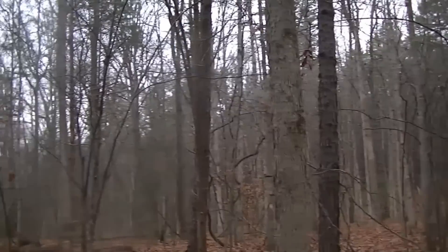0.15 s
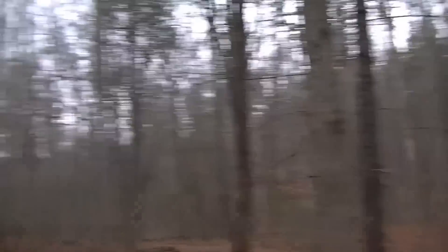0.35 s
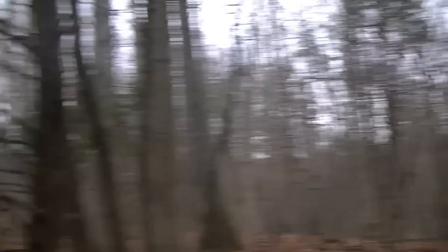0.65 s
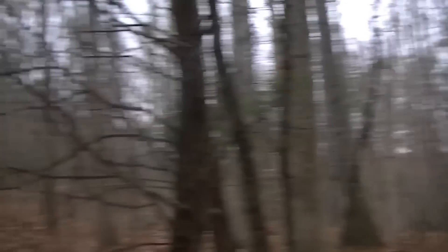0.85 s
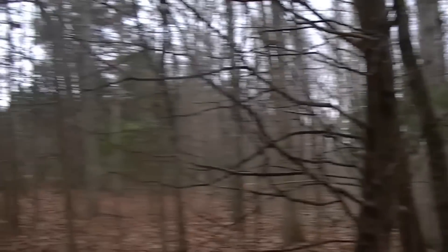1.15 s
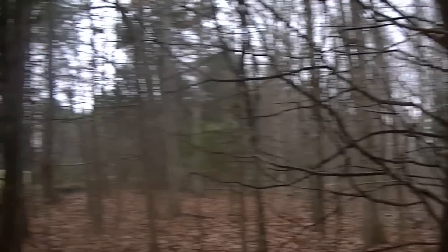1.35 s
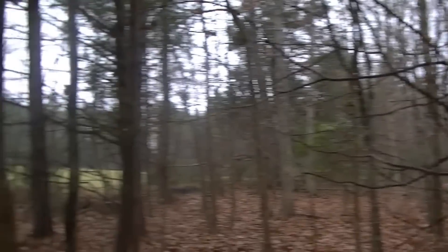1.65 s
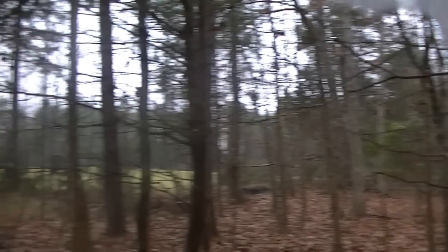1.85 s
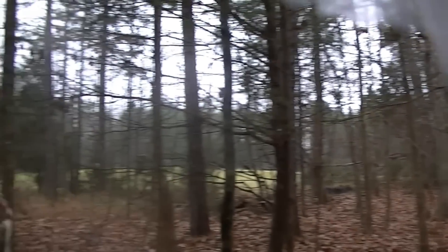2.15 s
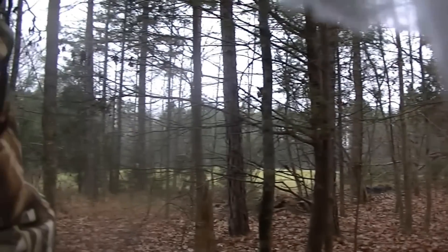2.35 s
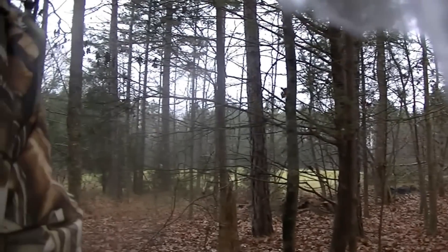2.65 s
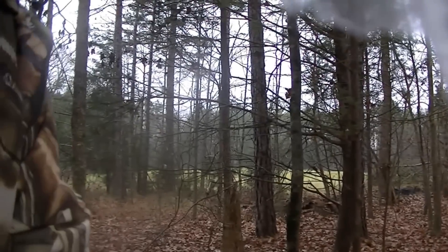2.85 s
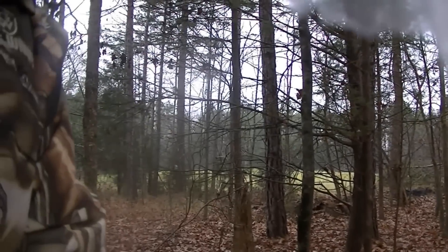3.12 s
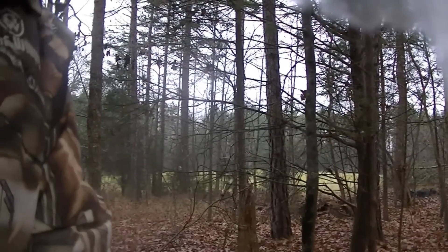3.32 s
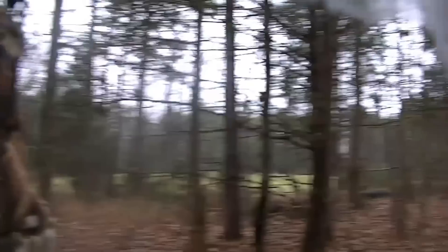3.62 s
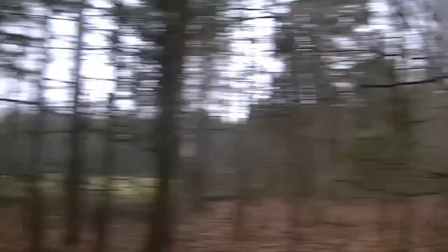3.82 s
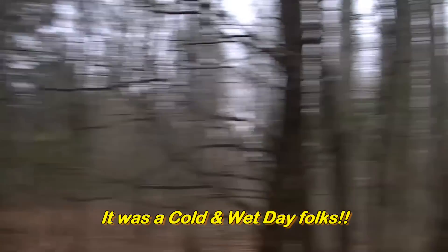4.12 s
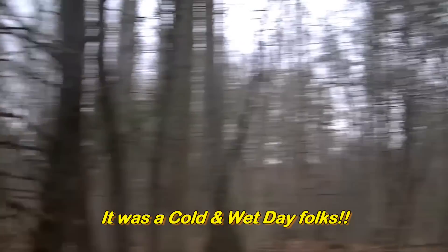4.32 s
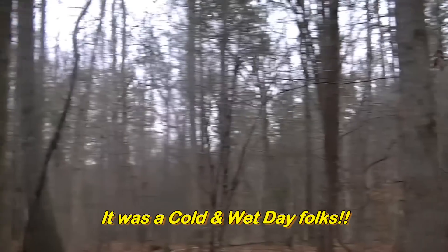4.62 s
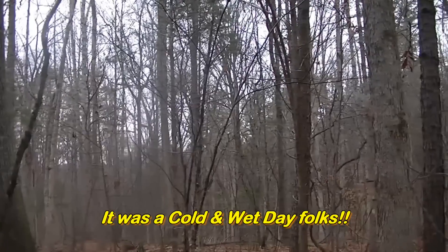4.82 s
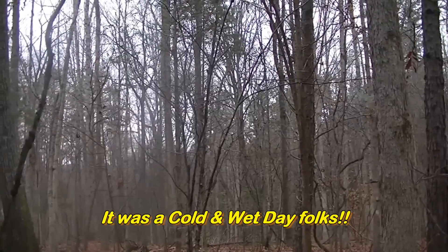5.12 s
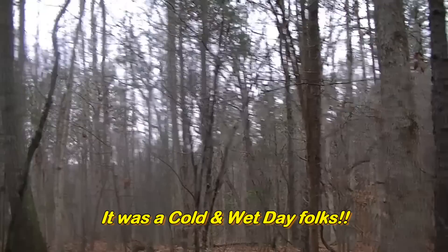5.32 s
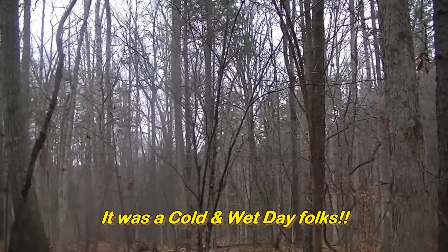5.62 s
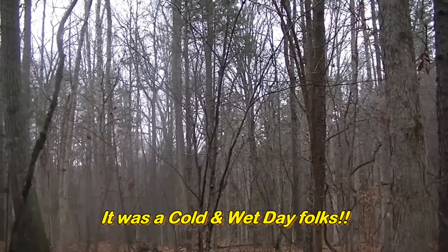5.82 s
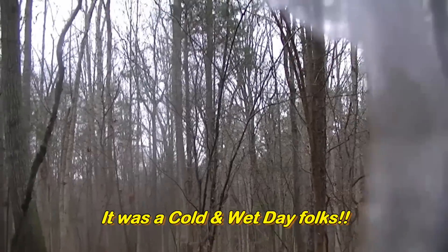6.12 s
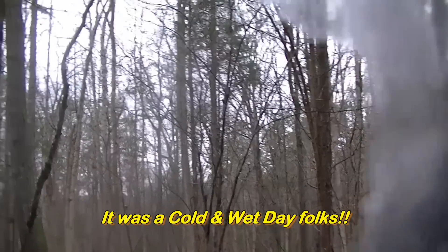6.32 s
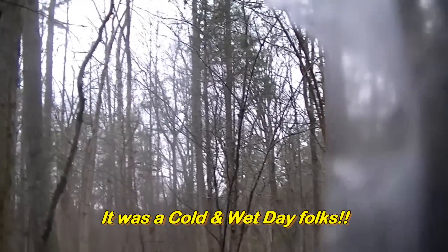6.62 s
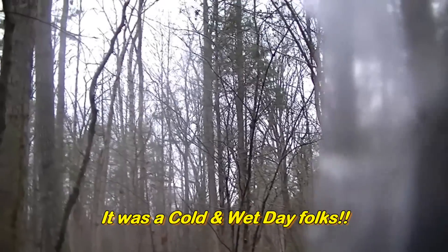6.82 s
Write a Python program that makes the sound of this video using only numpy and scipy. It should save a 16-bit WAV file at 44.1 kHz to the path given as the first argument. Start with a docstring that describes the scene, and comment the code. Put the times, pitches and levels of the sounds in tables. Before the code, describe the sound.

Very close, loud crinkling and snapping of thin plastic film with muffled handling bumps, easing briefly, then returning hard; quiet wet forest behind.

```python
"""Sharp plastic crackle and dull knocks, right up against a hand-held camera's stereo microphone.
A thin rain cover shifts in a wet forest: its creases snap as ringing noise bursts, its folds bump
the housing as decaying modes, and its strokes rumble and rustle as shaped noise.
Snaps and bumps leave a short diffuse tail; a narrow hiss swells twice as the camera turns.
Light rain and air lie beneath as a quiet noise floor."""
import sys
import numpy as np
from scipy import signal
from scipy.fft import rfft, irfft
from scipy.io import wavfile

SR = 44100
rng = np.random.default_rng(int(sys.argv[2]) if len(sys.argv) > 2 else 0)


def to_wav(sig):
    """Store sig (one row per channel, or 1-D mono) as 16-bit WAV at the path in sys.argv[1].

    Samples outside -1..1 are clipped; the rate is SR.
    """
    pcm = np.clip(np.atleast_2d(sig), -1, 1) * 32767
    pcm = np.round(pcm).astype(np.int16)
    wavfile.write(sys.argv[1], SR, pcm.T)  # frames by channels


def voltage_ratio(level):
    """Linear amplitude factor for a level in decibels (scalar or array-like)."""
    return 10 ** (np.asarray(level, float) / 20)


N = 306936   # length in samples

# Rain and air around the microphone. Each row: frequency in Hz, relative density in dB per Hz.
AIR_SPECTRUM = [(30, -12), (85, 6), (750, -2), (1200, -9), (6000, -24.5), (16000, -26)]
AIR_DB = -51   # rms
# Left-right likeness of the diffuse sound. Each row: frequency in Hz, correlation from 0 to 1.
STEREO_LIKENESS = [(60, 1), (200, 0.74), (1300, 0.35), (15000, 1)]
# Swells of narrow hiss as the camera turns. Each row: middle in seconds,
# time from the middle to 1/e of the amplitude in seconds, rms level at the middle in dB.
TURN_SWELLS = [(1.198, 0.3, -61), (4.1, 0.55, -56.5)]
TURN_HZ, TURN_WIDTH_HZ = 8300, 910   # width of each of two resonances in a row

# Strokes of the film across the housing. Each row: start in seconds, length in seconds,
# low rumble in dB, bright rustle in dB (both rms, before the sag).
FILM_STROKES = [(0.074, 0.082, -38.5, -46.5), (0.328, 0.062, -34.5, -51), (0.359, 0.42, -29, -40.5),
                (0.796, 0.48, -37, -51.5), (1.397, 0.93, -45.5, -53.5), (3.415, 0.2, -44.5, -51),
                (3.737, 0.58, -34, -45), (4.266, 0.053, -31.5, -40.5), (4.364, 0.31, -36, -52.5),
                (5.34, 0.062, -40.5, -81), (5.877, 0.23, -31.5, -46), (5.978, 0.21, -27, -38),
                (6.198, 0.048, -32.5, -37), (6.326, 0.021, -33, -38.5), (6.416, 0.188, -30, -40),
                (6.629, 0.39, -34, -41)]
# Level between strokes. Each row: rms level in dB; rumble first, then rustle.
RESTING_LEVELS = [
    [-54],
    [-55],
]
STROKE_ATTACK_S, STROKE_SAG_DB_PER_S, STROKE_RELEASE_DB_PER_S = 0.0146, 8, 240
# Low sound of the sliding film. Each row: frequency in Hz, relative density in dB per Hz.
RUMBLE_SPECTRUM = [(40, -20), (110, -4.5), (300, -4.5), (700, -14), (2400, -43)]
# Bright sound of the sliding film. Each row: frequency in Hz, relative density in dB per Hz.
RUSTLE_SPECTRUM = [(500, -9.5), (1200, 1), (2200, -5.5), (3500, 0), (16000, -18.5)]

# Folds knocking the housing. Each row: start in seconds, peak in dB before a slight tilt to the left,
# colour in Hz.
FOLD_BUMPS = [(0.0641, -19, 213), (0.1382, -18.5, 228.3), (0.3814, -8.5, 367), (0.422, -10, 253),
              (0.5061, -11, 310), (0.5471, -2.5, 520), (0.632, -11, 332), (0.8567, -15.5, 409),
              (0.933, -14, 397), (1.1199, -16.5, 272), (1.166, -16, 233.8), (1.2184, -15, 302.6),
              (1.4272, -19.5, 265), (1.63, -13.5, 474), (1.7861, -18.5, 535), (1.8493, -13.5, 284),
              (2.1824, -17, 295), (2.271, -18.5, 200), (2.4515, -21, 372), (2.5862, -21, 161),
              (2.9236, -25, 243), (3.0706, -5.5, 398), (3.2721, -10, 270), (3.5693, -9.5, 464),
              (3.6678, -17, 532), (3.7445, -13.5, 400), (3.8143, -10.5, 588), (3.8402, -8.5, 434),
              (4.0498, -10.5, 354), (4.16, -5, 146), (4.3866, -17.5, 377), (4.5016, -18.5, 304),
              (4.637, -17, 209.2), (5.257, -27, 190.8), (5.378, -20.5, 159.7), (5.9046, -13.5, 163.9),
              (6.0655, -8, 307), (6.104, -10.5, 573), (6.1195, -2, 428.4), (6.164, -0.5, 425),
              (6.3663, -4.5, 574), (6.434, -7.5, 570), (6.4757, -0.5, 579), (6.505, -12.5, 400)]
# Modes of the housing, before the grip shifts them. Each row: frequency in Hz, 60 dB decay in seconds.
HOUSING_MODES = [(98, 0.097), (130, 0.084), (170, 0.039), (235, 0.037), (310, 0.02), (400, 0.024),
                 (560, 0.016), (800, 0.013), (1200, 0.008)]
GRIPS, GRIP_OCTAVES = 9, 0.18   # ways the hand holds the housing; spread of each mode's shift
# Small folds: rate at a rumble of -45 dB, dB of rate per dB of rumble, least peak over the rumble
BUMPS_PER_S, BUMP_RATE_FOLLOWS, BUMP_OVER_RUMBLE_DB = 38, .3, 4.5
JOLT_DB, JOLT_HZ = -10.5, 905   # what each listed snap passes on to the housing, relative to the snap

# Creases popping on the housing. Each row: start in seconds, peak in dB, colour in Hz.
CREASE_SNAPS = [(0.1379, -12.5, 4452), (0.308, -17, 3697), (0.3841, -1.5, 4660), (0.3921, 0, 6480),
                (0.42, -4, 6620), (0.4345, 1, 9100), (0.4512, -10.5, 2803), (0.4909, -15, 1470),
                (0.526, -10.5, 1770), (0.5513, -9.5, 5730), (0.6226, -12, 5000), (0.6287, -1.5, 8630),
                (0.681, -2.5, 3350), (0.6906, -1.5, 8100), (0.6998, -14, 6000), (0.735, -8.5, 4400),
                (0.9947, -9, 4451), (1.4497, -18.5, 3706), (1.5504, -13, 5905), (1.6132, -11.5, 2814),
                (1.8794, -14, 3510), (1.885, -16.5, 1170), (1.9859, -17, 3940), (2.2467, -10.5, 3940),
                (2.2696, -12, 3336), (2.5764, -18, 2560), (2.8212, -7.5, 4800), (2.8769, -17.5, 2840),
                (2.9658, -16.5, 1490), (2.973, -12.5, 6200), (3.0248, -17, 7170), (3.0546, -8, 4340),
                (3.0697, -6, 4330), (3.1724, -15, 4870), (3.242, -13, 3260), (3.429, -6, 3910),
                (3.4728, -12.5, 2030), (3.4822, -16, 2490), (3.5193, -19.5, 1070), (3.535, -12.5, 3700),
                (3.631, -9.5, 4600), (3.6446, -13, 1170), (3.7431, -6.5, 3450), (3.7698, -13, 3300),
                (3.7871, -13, 3010), (3.814, -10, 3640), (3.8735, -19.5, 2477), (3.919, -4.5, 4570),
                (4.018, -2.5, 8120), (4.072, -14, 2480), (4.1546, -9, 2860), (4.2673, -13.5, 3180),
                (4.3317, -8, 3310), (4.4334, -18, 985), (4.6615, -8, 3230), (5.087, -20, 1200),
                (5.639, -21.5, 3482), (5.721, -24.5, 1644), (6.0004, -8, 5140), (6.048, -5, 4230),
                (6.1266, -9, 2824), (6.157, -8.5, 5103), (6.2432, -18.5, 2880), (6.3526, -22, 3000),
                (6.484, -4, 3460), (6.536, -7, 3630), (6.5497, -12, 3580), (6.5919, -13, 3144),
                (6.644, -8, 4200), (6.7079, -7, 3485), (6.7456, -6, 6520), (6.8386, -15.5, 3960),
                (6.8543, -8, 6103), (6.8959, -2.5, 7200)]
# Creases popping clear of the housing, without a jolt. Each row: start in seconds, peak in dB, colour in Hz.
FREE_POPS_CLEAR = [(3.0479, 4, 6203), (4.7601, 3, 6630), (4.8274, -7.5, 1240)]
# Small creases: rate at a rustle of -50.5 dB, dB of rate per dB of rustle, least peak over the rustle
SNAPS_PER_S, SNAP_RATE_FOLLOWS, SNAP_OVER_RUSTLE_DB = 60, .55, 15.5
CLUMPING_DB = 4   # small creases come in flurries: spread of their rate
SCRATCH_DB, SCRATCH_HZ = -8.5, 1570   # scratch of film that starts each listed bump, relative to it

BASS_ALIKE_HZ = 106   # below this both capsules move together


def at_hz(points, hz):
    """A spectrum read on a log-frequency axis."""
    point_hz, value = np.transpose(points)
    return np.interp(np.log(hz), np.log(point_hz), value)


def rms_one(x):
    """Scale to unit rms."""
    return x / np.sqrt(np.mean(x ** 2) + 1e-20)


def drift(rate_hz):
    """Random wander of spread 1: noise through two equal low-pass poles, run at SR / 40."""
    r = np.exp(-80 * np.pi * rate_hz / SR)
    noise = rng.standard_normal(N // 40 + 2002)
    slow = signal.lfilter([1], [1, -2 * r, r * r], noise)[2000:]   # past the settling
    return np.interp(np.arange(N) / 40, np.arange(len(slow)), rms_one(slow))


def resonate(x, hz, width_hz):
    """Two-pole resonance with a gain of about 1 at its top."""
    r = np.exp(-np.pi * width_hz / SR)
    poles = [1, -2 * r * np.cos(2 * np.pi * hz / SR), r * r]
    return signal.lfilter([(1 - r * r) / 2, 0, (r * r - 1) / 2], poles, x)


def stereo_noise(spectrum, patchy_db, grain_db, grain_hz=65):
    """Stereo noise shaped to a spectrum, partly alike left and right, lumpy in time; rms 1."""
    hz = np.maximum(np.arange(N // 2 + 1) * SR / N, 10)
    alike = np.clip(at_hz(STEREO_LIKENESS, hz), 0, 1)
    lumps = voltage_ratio(patchy_db * drift(2.54) + grain_db * drift(grain_hz))
    mid, side = rfft(rng.standard_normal((2, N)) * lumps) * voltage_ratio(at_hz(spectrum, hz))
    mid, side = mid * np.sqrt(1 + alike), side * np.sqrt(1 - alike)
    return rms_one(irfft([mid + side, mid - side], N))


def rain_and_air():
    """The quiet floor: steady noise, strongest in the bass, with a fine grain."""
    return voltage_ratio(AIR_DB) * stereo_noise(AIR_SPECTRUM, patchy_db=-0.3, grain_db=3.5)


def turning_hiss():
    """Noise in one narrow band under rounded swells, the same in both channels."""
    t = np.arange(N) / SR
    level = sum(voltage_ratio(db) * np.exp(-((t - s) / half_s) ** 2) for s, half_s, db in TURN_SWELLS)
    band = resonate(rng.standard_normal(N), TURN_HZ, TURN_WIDTH_HZ)
    band = resonate(band, TURN_HZ, TURN_WIDTH_HZ)
    return level * rms_one(band)


def afterglow(x, gap_s=0.0066, t60=0.34, tail_db=-17):
    """Diffuse echoes from cover, ground and trunks: decaying noise after a short gap."""
    t = np.arange(SR // 3) / SR
    mid, side = rng.standard_normal((2, len(t))) * voltage_ratio(-60 * t / t60) * (t > gap_s)
    tail = np.array([mid + side, mid - side])
    tail = signal.lfilter([1], [1, -.4], tail)   # leaves and wet bark dull the echoes
    tail = tail / np.sqrt(np.sum(tail[0] ** 2))
    return voltage_ratio(tail_db) * signal.fftconvolve(x, tail, axes=1)[:, :N]


def rubbing_levels():
    """Levels (dB) of rumble and rustle: each stroke sets in fast, sags while it lasts, then dies away."""
    t, power = np.arange(N) / SR, voltage_ratio(RESTING_LEVELS) ** 2
    for s, length_s, *db in FILM_STROKES:
        sag_db = STROKE_SAG_DB_PER_S * (t - s)
        release_db = STROKE_RELEASE_DB_PER_S * np.maximum(t - s - length_s, 0)
        shape = np.clip((t - s) / STROKE_ATTACK_S, 0, 1) * voltage_ratio(-sag_db - release_db)
        power = power + (voltage_ratio(np.array(db)[:, None]) * shape) ** 2
    return 10 * np.log10(power)


def sliding_film(rumble_db, rustle_db):
    """Friction of film on housing: a low and a bright noise that follow the strokes."""
    rumble = voltage_ratio(rumble_db) * stereo_noise(RUMBLE_SPECTRUM, patchy_db=4.0, grain_db=4.0)
    rustle = voltage_ratio(rustle_db) * stereo_noise(RUSTLE_SPECTRUM, patchy_db=-2.5, grain_db=3.0, grain_hz=127)
    return rumble + rustle


def by_chance(per_s, level_db, spread_db, low_hz, high_hz, count):
    """Rows (s, dB, Hz) of at most count small events; per_s and level_db follow the rubbing in time."""
    draw = rng.random((count, 4))
    at = (draw[:, 0] * N).astype(int)
    kept = draw[:, 1] < per_s[at] * N / SR / count
    size_db = level_db[at] - spread_db * np.log(1 - .9 * draw[:, 2])
    colour_hz = low_hz * (high_hz / low_hz) ** draw[:, 3]
    return np.c_[at / SR, size_db, colour_hz][kept]


def bumps(rows, above_db=1.93, below_db=6.0, steepening=1.8, wobble_db=3.0, unlike_db=4.0, rise_cycles=0.38):
    """A fold strikes housing modes near its colour; low modes swell later, and most last longer."""
    hz, t60 = np.transpose(HOUSING_MODES)[:, :, None]
    t = np.arange(SR // 8) / SR
    gripped_hz = hz * 2 ** (GRIP_OCTAVES * rng.standard_normal((GRIPS, len(hz), 1)))
    swell = 1 - np.exp(-t * hz / rise_cycles)
    modes = np.sin(2 * np.pi * gripped_hz * t) * voltage_ratio(-60 * t / t60) * swell
    out = np.zeros((2, N + len(t)))
    chance = rng.standard_normal((len(rows), 3, len(hz)))   # both channels, left only, right only
    for k, ((s, db, colour_hz), (shared, *own)) in enumerate(zip(rows, chance)):
        octaves = np.log2(hz[:, 0] / colour_hz)
        fall_db = np.where(octaves > 0, above_db, below_db) * np.abs(octaves) ** steepening
        mode_db = wobble_db * shared + unlike_db * np.array(own) - fall_db
        bump = (voltage_ratio(mode_db) * np.sign(shared)) @ modes[k % GRIPS]   # the grips take turns
        i = round(s * SR)
        out[:, i:i + len(t)] += voltage_ratio(db) * bump / np.abs(bump).max()
    return out[:, :N]


def fold_knocks(rumble_db):
    """Listed folds, jolts from the listed snaps, and small folds that follow the rumble."""
    per_s = BUMPS_PER_S * voltage_ratio(BUMP_RATE_FOLLOWS * (rumble_db + 45))
    small = by_chance(per_s, rumble_db + BUMP_OVER_RUMBLE_DB, 6.9, 136, 565, count=600)
    jolts = [(s, db + JOLT_DB, JOLT_HZ) for s, db, hz in CREASE_SNAPS]
    large = bumps(FOLD_BUMPS, above_db=4.5, below_db=7.5, steepening=1.26, rise_cycles=0.72)
    return (large + bumps(np.r_[jolts, small])) * voltage_ratio([[1.0], [-1.0]])   # dB, left and right


def snaps(rows, rattle_s=0.0066, ring_cycles=5.5, broad_db=-3, sharpness=2.02, unlike=0.2, pure=False):
    """A crease pops: a brief burst rings around its colour; bright colours add more broad crack."""
    length = SR // 60
    out, t = np.zeros((2, N + length)), np.arange(length) / SR
    noise = rng.standard_normal((len(rows), 2, length))
    noise[:, 0, 8] += 9.0   # the buckling itself is one sharp step; the rest is rattle
    for (s, db, hz), (mid, side) in zip(rows, noise):
        t60 = rattle_s + ring_cycles / hz
        stereo = mid + unlike * side * [[1], [-1]]
        burst = stereo * voltage_ratio(-60 * t / t60) * np.minimum(t / 0.00057, 1)
        crack = voltage_ratio(broad_db) * (hz / 5000) ** 2.05 * resonate(burst, 5600, 16000)
        ring = resonate(burst, hz, hz / sharpness)
        if pure:   # a second pass leaves a cleaner wavelet
            ring = resonate(ring, hz, hz / sharpness)
        pop = 2 * ring + crack
        i = round(s * SR)
        out[:, i:i + length] += voltage_ratio(db) * pop / np.abs(pop).max()
    return out[:, :N]


def crease_pops(rustle_db):
    """Listed snaps, scratches that start the bumps, small snaps that follow the rustle, and free pops."""
    per_s = SNAPS_PER_S * voltage_ratio(SNAP_RATE_FOLLOWS * (rustle_db + 50.5) + CLUMPING_DB * drift(9))
    small = by_chance(per_s, rustle_db + SNAP_OVER_RUSTLE_DB, 5.12, 625, 7070, count=2500)
    scratches = [(s, db + SCRATCH_DB, SCRATCH_HZ) for s, db, hz in FOLD_BUMPS]
    free = snaps(FREE_POPS_CLEAR, rattle_s=0.00063, ring_cycles=3.7, broad_db=-13, sharpness=1.87, pure=True)
    return snaps(np.r_[CREASE_SNAPS, scratches, small]) + free


def scene():
    """Floor, hiss and sliding film behind; knocks, pops and their tail close to the microphone."""
    rumble_db, rustle_db = rubbing_levels()
    background = rain_and_air() + turning_hiss()
    film = sliding_film(rumble_db, rustle_db)
    knocks = fold_knocks(rumble_db)
    pops = crease_pops(rustle_db)
    return background + film + afterglow(pops + .5 * knocks) + knocks + pops


def band_limit(x):
    """A steep low-pass at the top of the band."""
    return signal.sosfilt(signal.butter(12, 16990, fs=SR, output="sos"), x)


def record(dry):
    """The small capsules: low cut, bass in common, a hard ceiling, then the top cut off."""
    low_cut = signal.butter(2, 42, "high", fs=SR, output="sos")
    left, right = signal.sosfilt(low_cut, dry)
    mid, side = (left + right) / 2, (left - right) / 2
    side_cut = signal.butter(2, BASS_ALIKE_HZ, "high", fs=SR, output="sos")
    side = signal.sosfilt(side_cut, side)
    limited = np.clip(np.array([mid + side, mid - side]), -1, 1)
    top_cut = signal.cheby2(18, 70, 17300, fs=SR, output="sos")
    mix = signal.sosfilt(top_cut, limited)
    return band_limit(mix)


dry = scene()
out = record(dry)
to_wav(out)
```